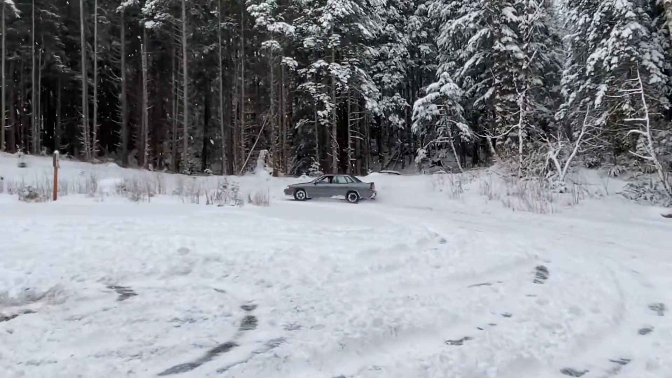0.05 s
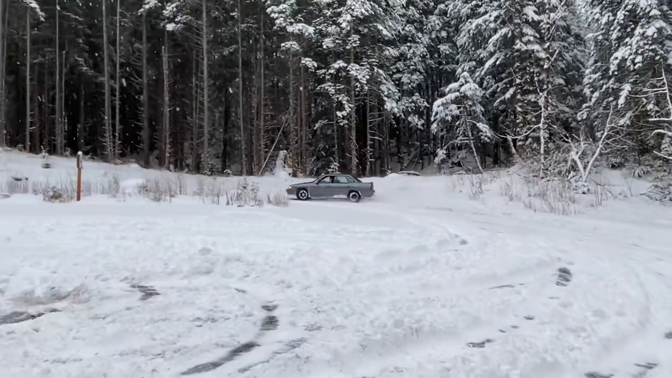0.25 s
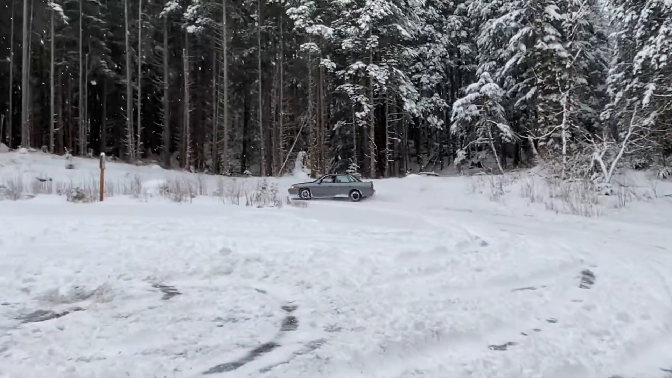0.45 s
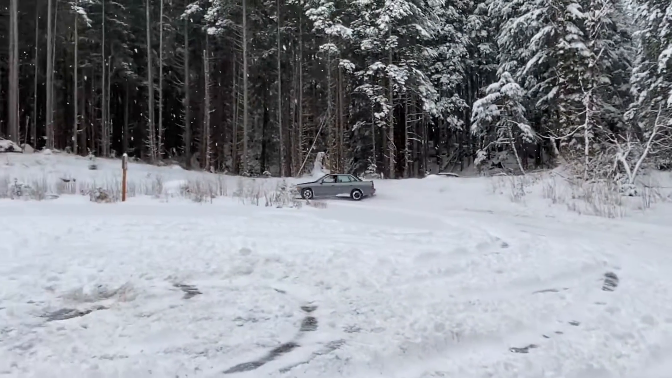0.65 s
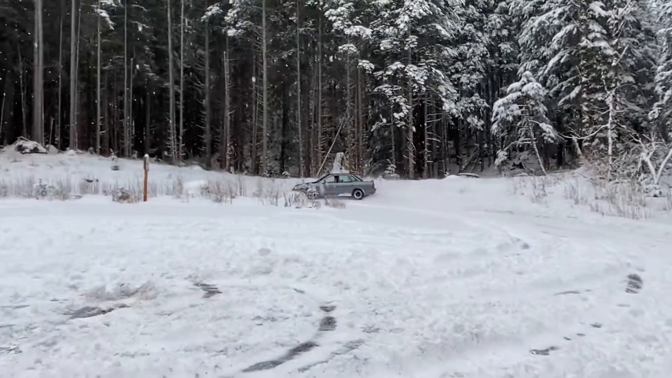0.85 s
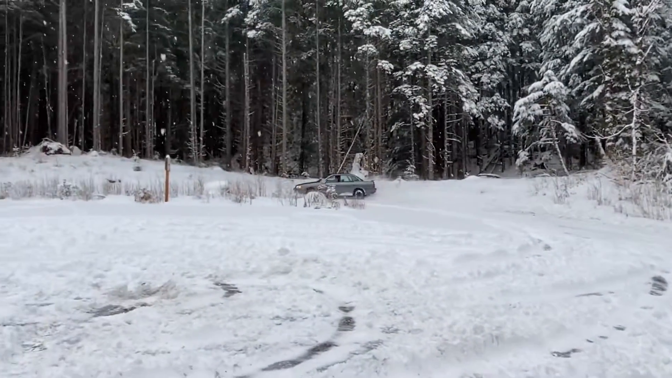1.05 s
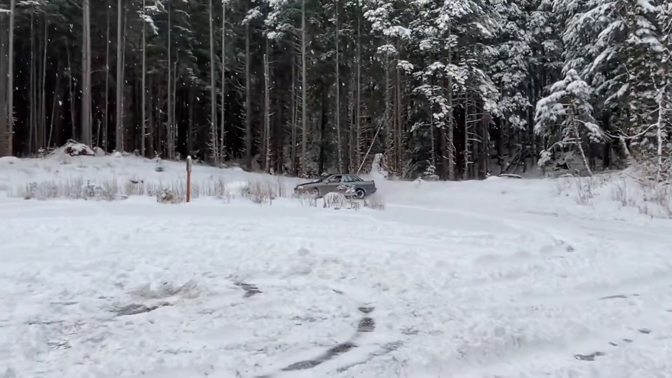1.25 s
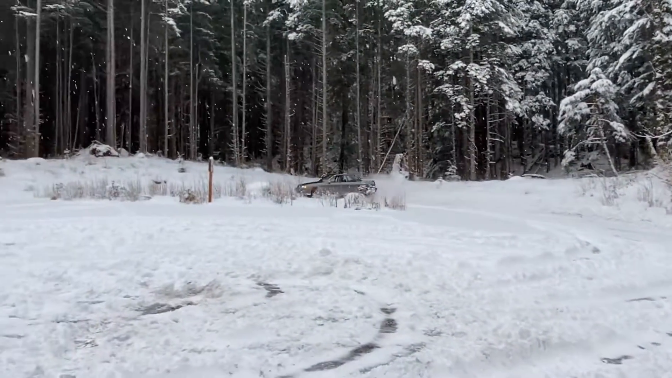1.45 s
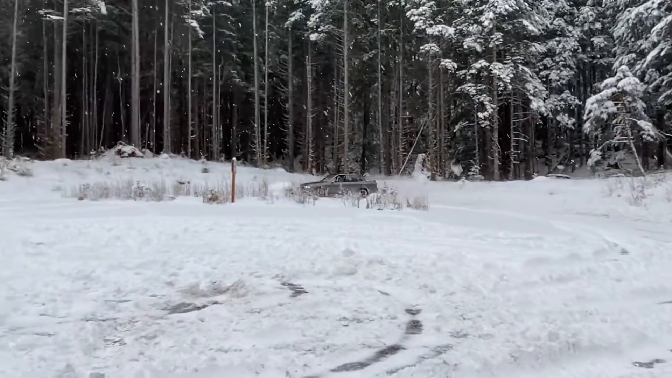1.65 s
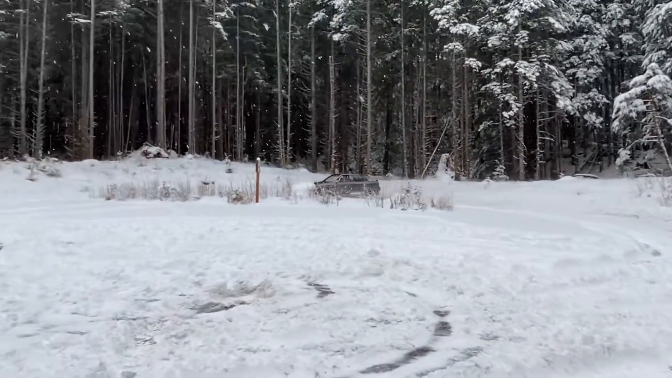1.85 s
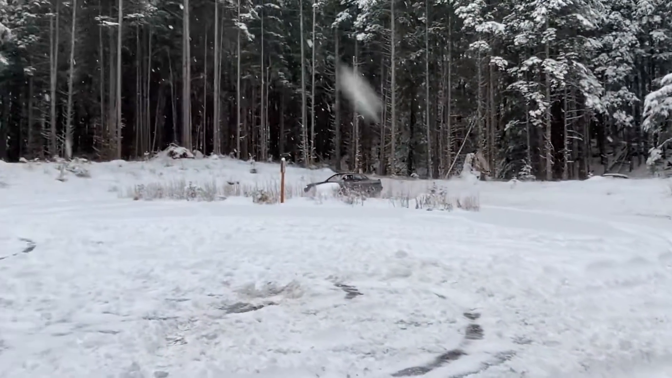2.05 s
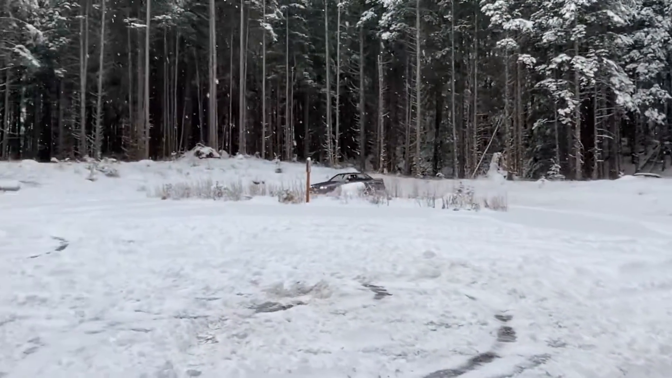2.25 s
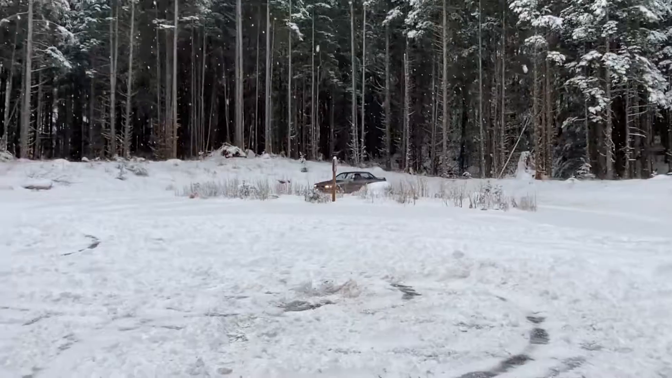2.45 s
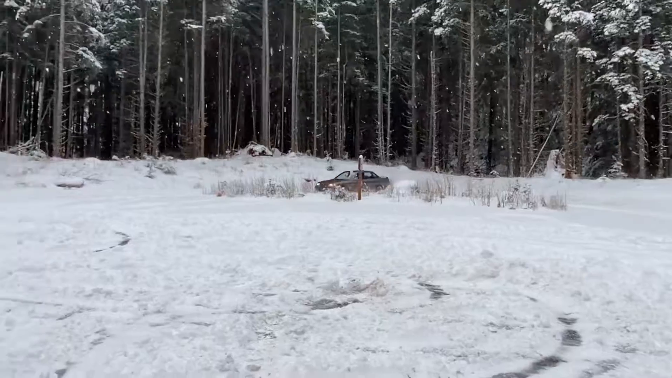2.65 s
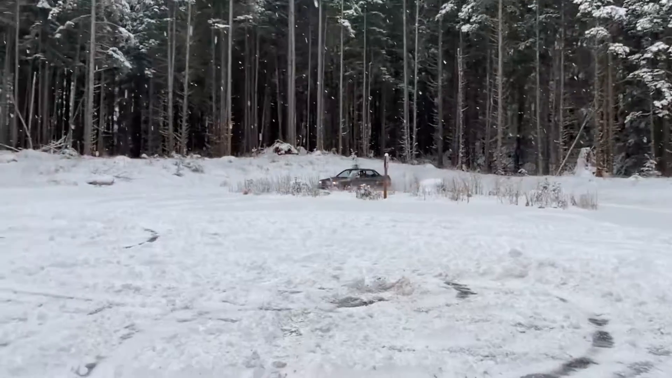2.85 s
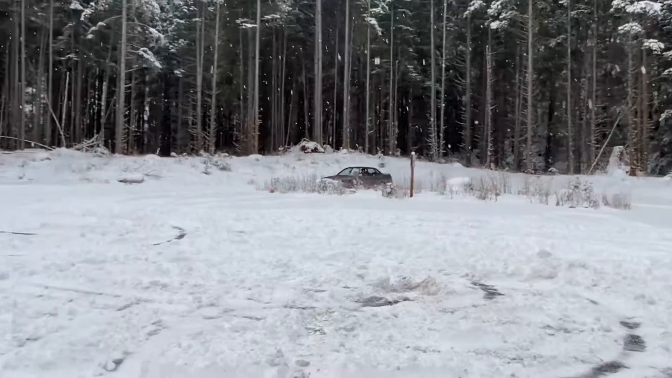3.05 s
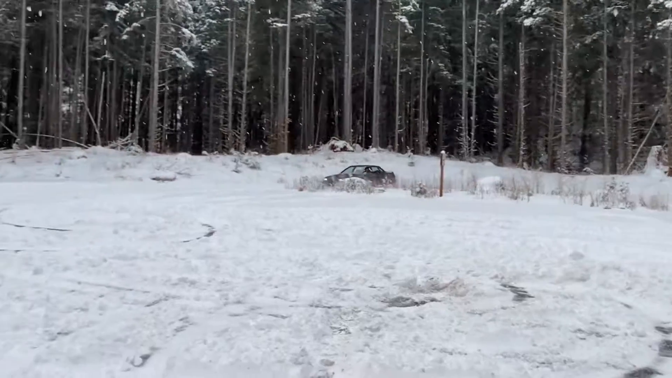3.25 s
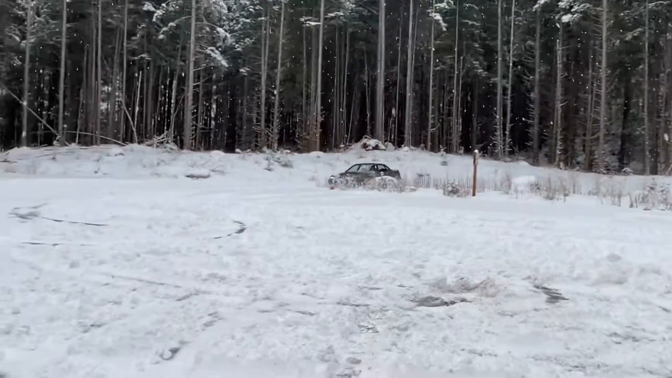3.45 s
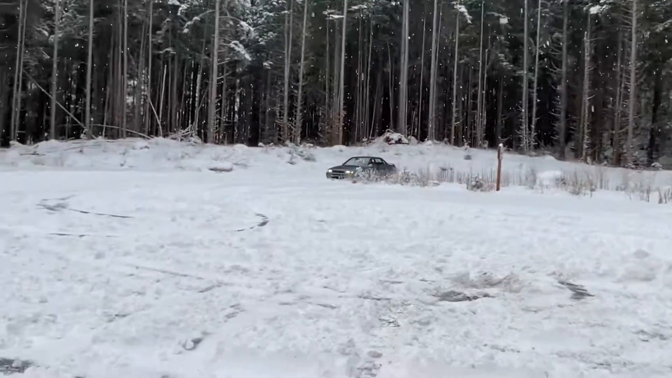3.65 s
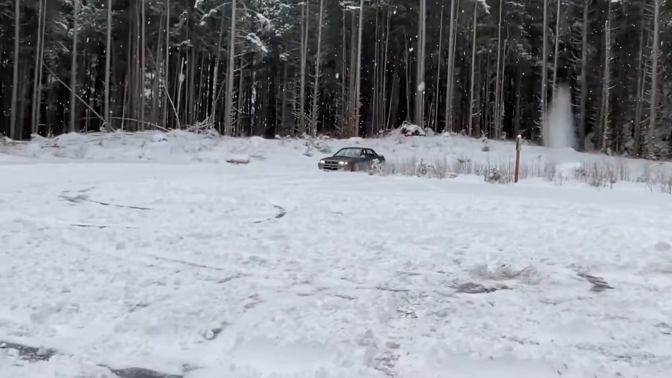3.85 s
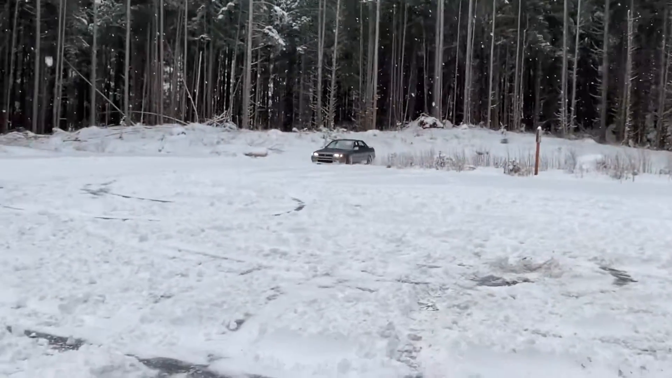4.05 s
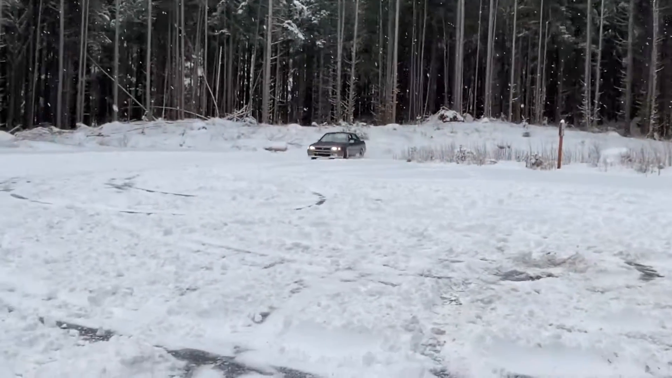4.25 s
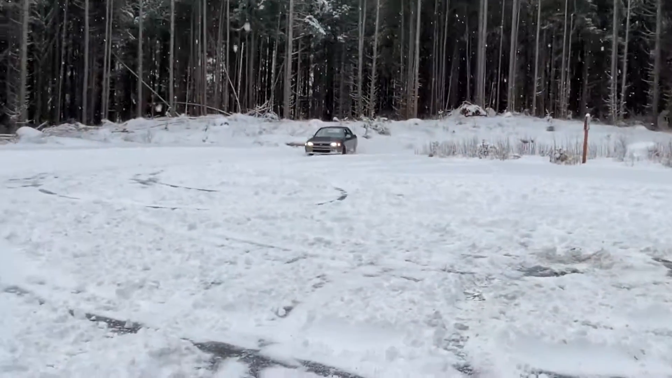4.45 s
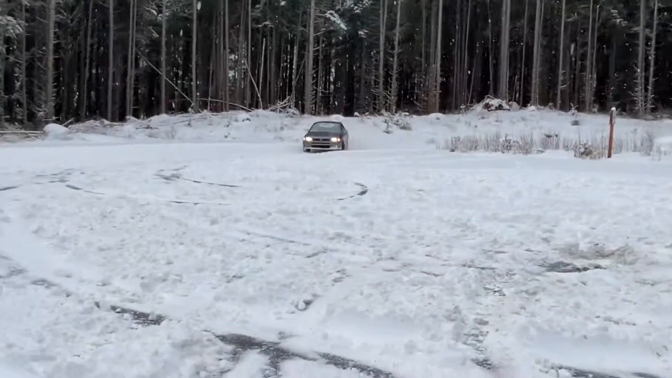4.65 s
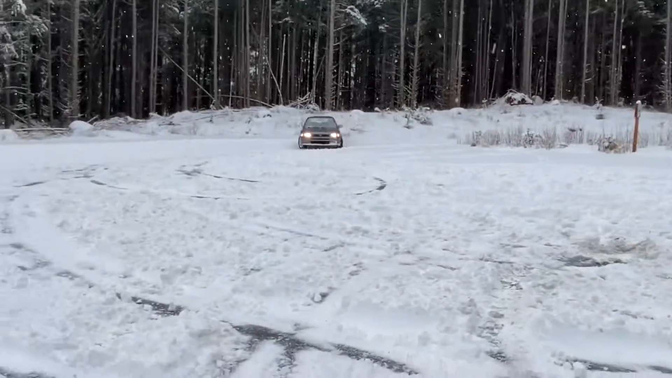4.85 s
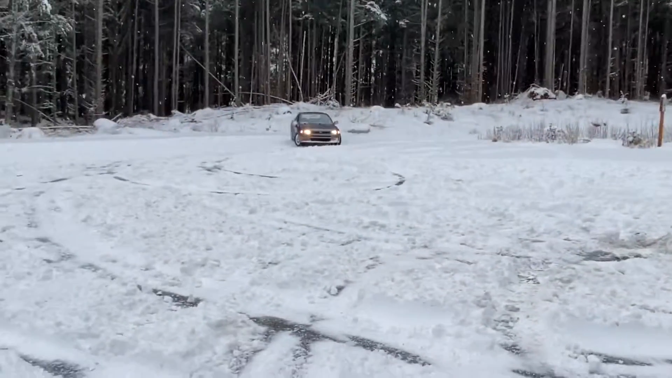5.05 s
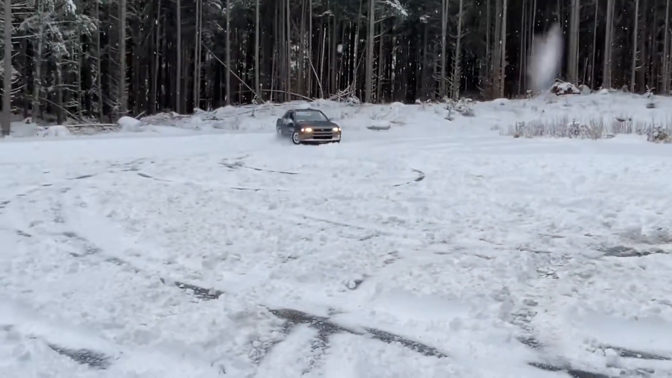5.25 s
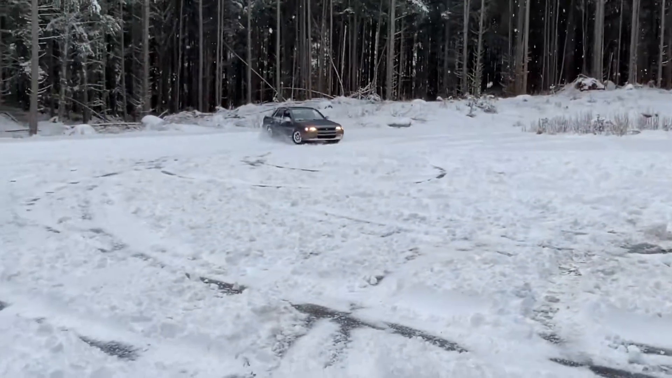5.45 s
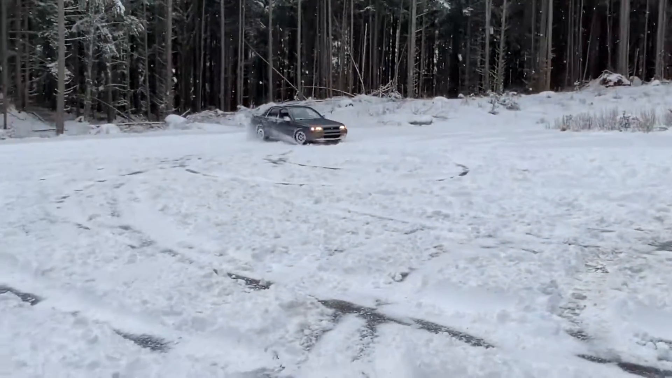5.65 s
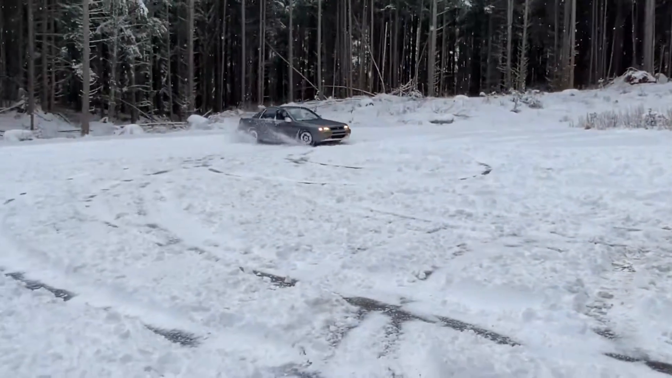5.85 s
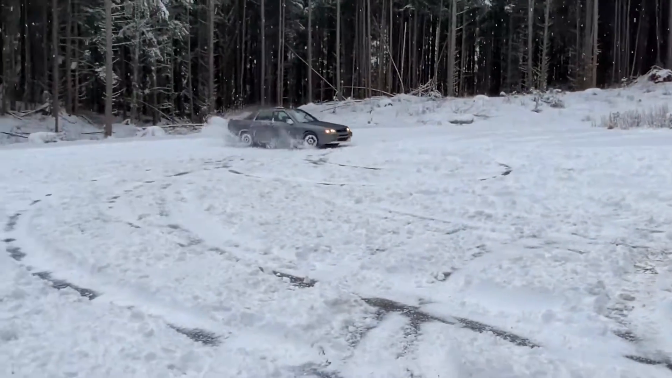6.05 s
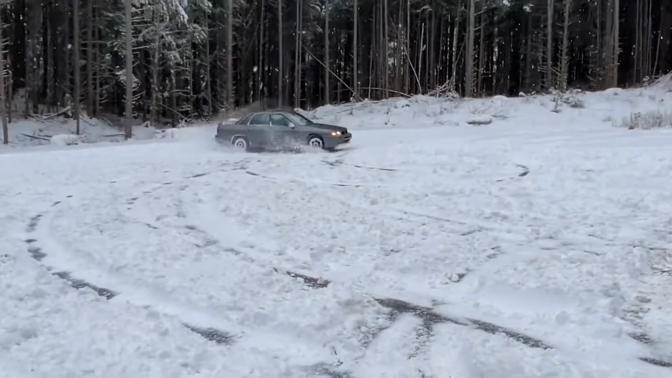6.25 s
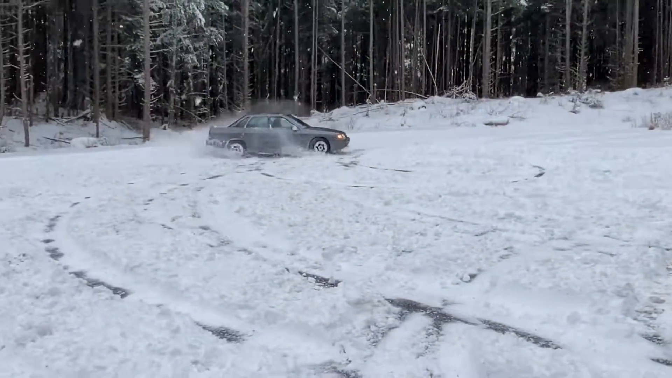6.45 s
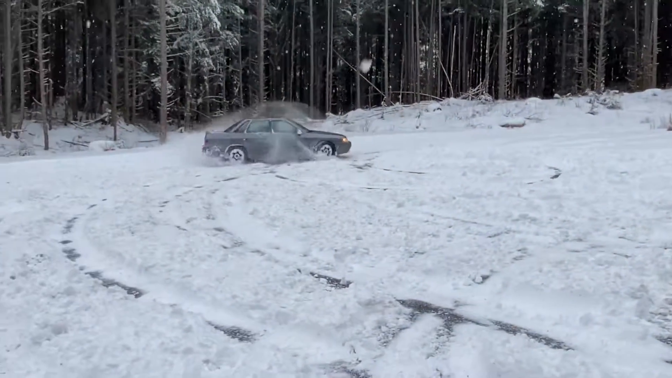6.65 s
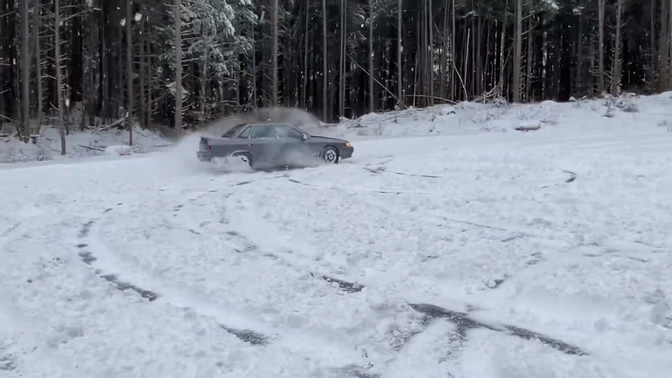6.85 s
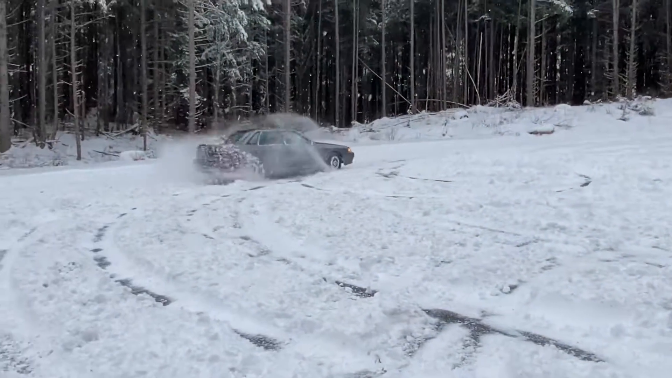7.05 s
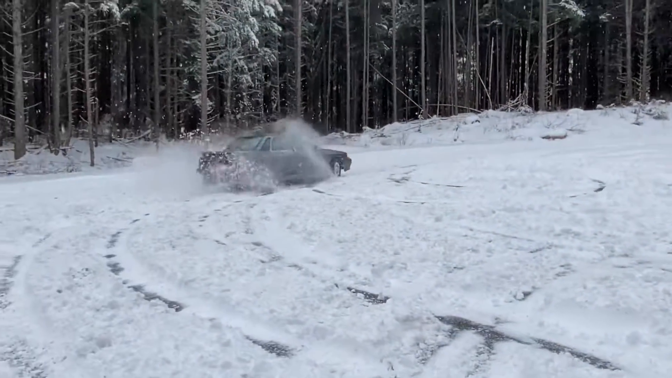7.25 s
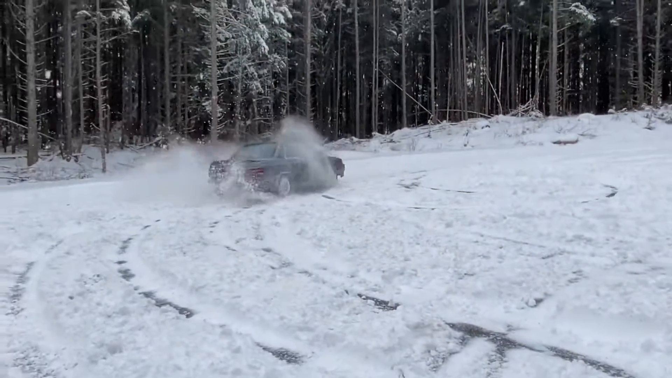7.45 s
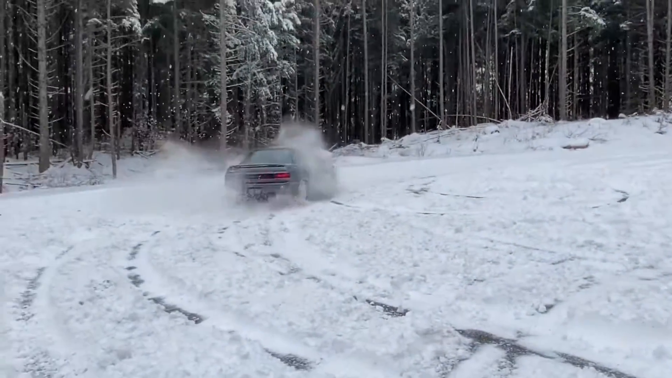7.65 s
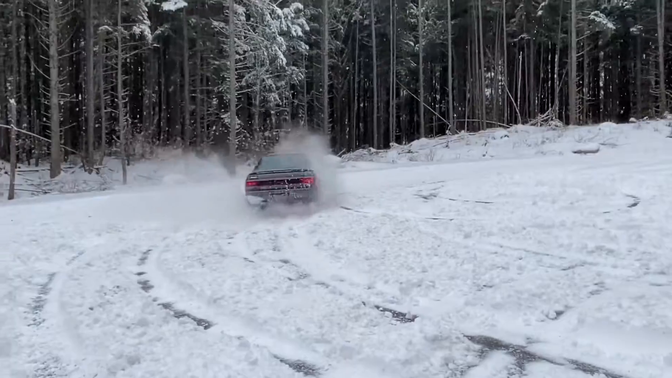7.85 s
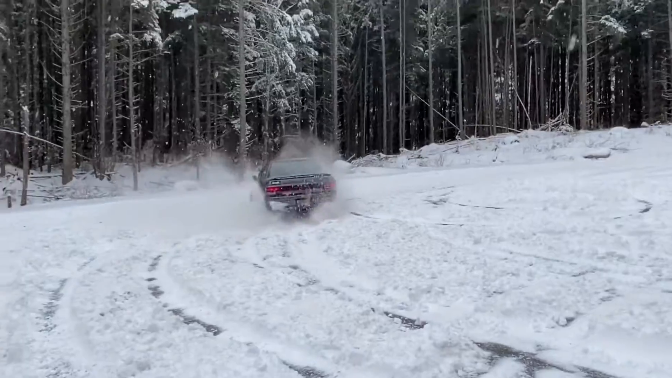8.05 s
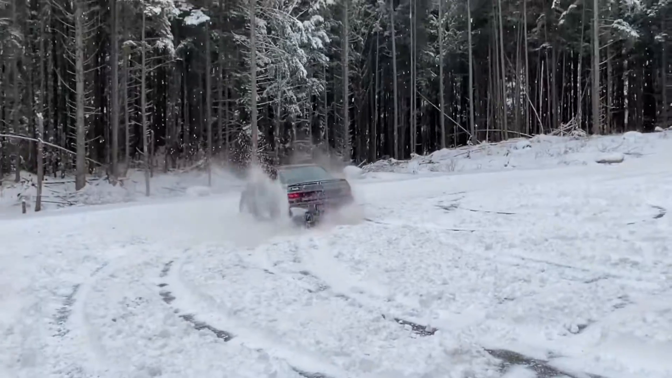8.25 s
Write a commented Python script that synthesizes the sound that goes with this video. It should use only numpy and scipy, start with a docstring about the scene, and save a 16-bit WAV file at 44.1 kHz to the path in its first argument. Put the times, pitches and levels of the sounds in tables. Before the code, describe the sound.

A lumpy exhaust note rises and falls as a car circles on snow. Early revs end in quick tailpipe pops, then the sound thins with distance. Chirping puffs of turbo air and soft thuds follow each throttle lift. The car comes nearer, roaring and buzzing at high revs with banging cracks, while tyres hiss through snow and trees give a short echo.

```python
"""Turbo car drifting in the snow

A turbocharged car with a lumpy engine drifts round a snowy clearing, from far off to close by; level curves place it.
The exhaust drones as sines on the orders of the engine cycle, and blasts at each firing strike its resonances.
On lifts it stumbles and thuds, and the compressor flutters; sharp cracks ring the tailpipe.
A sine tied to engine speed is the turbo whistle; filtered noise makes the snow spray and the rumble,
and a decaying noise tail makes the forest answer."""
import sys
import numpy as np
from scipy import signal
from scipy.fft import rfft, irfft
from scipy.io import wavfile
from scipy.ndimage import uniform_filter1d

SR = 44100
rng = np.random.default_rng(int(sys.argv[2]) if len(sys.argv) > 2 else 0)


def bounce(signal):
    """Save signal as a 16-bit WAV file at the path given by the first command-line argument."""
    frames = np.transpose(np.atleast_2d(signal))
    limited = np.clip(frames, -1, 1)
    pcm = np.round(limited * 32767).astype(np.int16)
    wavfile.write(sys.argv[1], SR, pcm)


N = 366471
TIME = np.arange(N) / SR
FREQ = np.arange(N // 2 + 1) * SR / N
CYLINDERS = 4
SPIN_HZ = 37.2  # cycle rate at which the gas hiss and the spray have their nominal level
BLAST_DELAY_S = .0015  # from the firing to its blast


def undb(db):
    """dB to gain."""
    return 10 ** (np.asarray(db) / 20)


def unit(x):
    """Scale to rms 1."""
    return x / np.sqrt(np.mean(x ** 2))


def even(x):
    """Level out slow swells, so that the level curves set the loudness."""
    return x / np.sqrt(uniform_filter1d(x ** 2, size=6000) + 1e-12)


def at(table, hz):
    """Read a (Hz, value) table on a log-frequency axis."""
    f, v = np.transpose(table)
    return np.interp(np.log(hz + 1), np.log(f + 1), v)


def curves(table):
    """Draw each column of a table against its first column, the time in seconds."""
    s, *columns = np.transpose(table)
    return [np.interp(TIME, s, column) for column in columns]


def walk(rate_hz):
    """Random levels held 1 / rate s and slewed twice; spread 1."""
    hold = int(SR / rate_hz)
    steps = np.repeat(rng.standard_normal(N // hold + 1), hold)
    return unit(uniform_filter1d(uniform_filter1d(steps, hold), hold)[:N])


def ring(x, modes):
    """Sum of resonances (Hz, width Hz, dB) with alternating signs."""
    out = 0
    for k, (hz, width_hz, db) in enumerate(modes):
        out = out + (-1) ** k * undb(db) * signal.lfilter(*signal.iirpeak(hz, hz / width_hz, SR), x)
    return out


def noise(table):
    """Noise of rms 1 with the given spectrum (Hz, dB per Hz)."""
    return unit(irfft(rfft(rng.standard_normal(N)) * undb(at(table, FREQ)), N))


def dull(x):
    """Steep low-pass at 12.4 kHz."""
    return signal.sosfilt(signal.ellip(8, .5, 50, 12400, fs=SR, output="sos"), x)


# Engine speed through the drift. Each row: time in seconds, engine cycles per second in Hz.
ENGINE_SPEED = [(0.0, 32.34), (0.23, 28.22), (0.32, 29.33), (0.76, 43.04), (1.1, 52.3), (1.28, 50.13),
                (1.64, 48.03), (1.9, 42.89), (1.98, 42.26), (2.61, 51.28), (2.82, 50.94), (3.1, 42.98),
                (3.56, 33.46), (3.89, 42.7), (3.98, 44.46), (4.35, 32.65), (4.47, 33.41), (4.67, 39.04),
                (4.84, 40.6), (5.19, 51.1), (5.6, 37.01), (6.11, 50), (6.23, 51.23), (6.5, 45.12),
                (6.59, 44.11), (6.73, 44.13), (6.94, 47.9), (7.22, 50.69), (7.35, 53.24), (7.62, 50.77),
                (7.84, 53.54), (7.98, 52.14), (8.31, 50.15)]


def engine_speed():
    """The engine's inertia rounds the corners of its speed curve."""
    inertia_s = .05
    return uniform_filter1d(curves(ENGINE_SPEED)[0], size=int(inertia_s * SR))


# Weight of each order of the cycle, in dB from order 1 up: uneven manifold runners favour some;
# higher orders take the last value.
ORDER_WEIGHTS = [-35.5, -20, 3.5, 6.5, 2, -14.5, 1.5, 5, 9, 9.5, 10, -6, -40, -3, -1.5, 0, -4.5, 3.5, -7,
                 -32, 3.5, 6.5, -1, 8.5, 10.5, 8]
# Exhaust pipe colour of the orders. Each row: frequency in Hz, gain in dB.
PIPE_COLOUR = [(70, 11), (130, -0.5), (210, -5.5), (285, -2.5), (355, 4.5), (450, -29), (565, -2.5),
               (650, 17), (750, 5.5), (1320, -9.5)]
# The fourth and fifth orders swell while the tail of the car shows. Each row: time in seconds, gain in dB.
FOURTH_FIFTH_SWELL = [(.4, 1), (1.2, 4.5), (1.6, -4), (3.1, -1.5), (4.6, 0.5), (5.3, -15), (5.9, 5),
                      (6.3, -12), (6.8, -0.5)]
# A band of orders stands out and shifts as the car swings round.
# Each row: time in seconds, centre in Hz, gain in dB.
SWINGING_BAND = [(0, 765, 7), (6.6, 815, 2.5), (7.15, 990, 15), (7.38, 850, 7), (7.52, 1150, 19),
                 (7.9, 1250, 1), (8.02, 1110, -30)]


def orders(cycle, hz, stumble, low_hz, high_hz):
    """The orders between two frequencies, each wavering alone, more when the engine stumbles."""
    swell_db, = curves(FOURTH_FIFTH_SWELL)
    band_hz, band_db = curves(SWINGING_BAND)
    band_width_hz = 164
    out = 0
    for k in range(1, 41):
        order_hz = k * hz
        share = np.clip(np.minimum(order_hz - low_hz, high_hz - order_hz) / 30 + .5, 0, 1)
        if not share.any():
            continue
        db = ORDER_WEIGHTS[min(k, len(ORDER_WEIGHTS)) - 1] + at(PIPE_COLOUR, order_hz)
        db = db + (1.5 + 4 * stumble) * walk(14)
        db = db + (k in (4, 5)) * swell_db
        db = db + band_db * np.exp(-((order_hz - band_hz) / band_width_hz) ** 2)
        slip = (.1 + .009 * k + .9 * stumble) * walk(22)  # radians
        # the square term spreads the orders over the several firings of a cycle
        out = out + share * undb(db) * np.cos(2 * np.pi * k * cycle - .8 * k * k + slip)
    return even(out)


# Moments in seconds at which a cycle's blast leaves the tailpipe; they keep the count in step.
BLAST_TIMES = [.484, .5691, .597, .63, .7053, .9078, 1.2162, 1.2955, 6.669, 6.803, 7.1366, 7.2845, 7.5175,
               7.689, 7.7275]


def in_step(cycle):
    """Shift the cycle count smoothly so that a cycle's blast falls on each listed moment."""
    count = np.interp(np.array(BLAST_TIMES) - BLAST_DELAY_S, TIME, cycle)
    behind = np.round(count) - count
    return cycle + 1 + np.interp(TIME, BLAST_TIMES, np.unwrap(behind, period=1))


# The tailpipe turns away behind the car and back. Each row: time in seconds, pipe ring, tip ring
# and silencer bark in dB over the rasp's orders, the other firings in dB relative to the main one.
FACING = [(0, 8, -20, 5.5, -2), (.3, -15, -25, 1, -9), (.6, -2, -21, 3.5, -12.5),
          (2.0, -10.5, -17, -2.5, -16), (2.6, -8.5, -17, -7.5, 5), (3.45, 0, -10, 1, -7),
          (3.65, -24, -19, 4.5, -8), (6.2, -6, -12, -4, -6), (6.7, -8.5, -9, 1, -17),
          (7.2, -8.5, -9.5, -5, -8), (7.6, 1, -6, 1, -9.5), (7.95, -14, -26, 1, -11)]


def cracks(turn, stumble):
    """A sharp blast at each firing, one cylinder set apart from the others; gas hisses on behind them."""
    others_db = curves(FACING)[3]
    firing = CYLINDERS * turn
    number = firing.astype(int)
    level_chance, time_chance = rng.standard_normal((N // 40, 2))[number].T
    other = number % CYLINDERS > 0
    late_s = (.00006 + .0003 * stumble) * time_chance
    since_firing_s = (firing % 1) / np.gradient(firing) / SR
    front = np.exp(-((since_firing_s - BLAST_DELAY_S - late_s) / .00004) ** 2)
    shock_db = (1.1 + 1.5 * other + 2.5 * stumble) * level_chance + other * others_db
    # the hiss thickens as the cycles come faster, and renews itself every 5.5 ms as it dies
    since_cycle_s = (turn % 1) / np.gradient(turn) / SR
    hiss_db = -25 + .6 * (np.gradient(turn) * SR - SPIN_HZ)
    decay = np.exp(-(since_cycle_s % .0055) / 0.004 - since_cycle_s / 0.02)
    return undb(shock_db) * front, undb(hiss_db) * decay * rng.standard_normal(N)


# Tailpipe resonances. Each row: frequency in Hz, width in Hz, gain in dB.
TAILPIPE = [(1735, 240, 7.5), (3500, 480, 0), (5600, 400, -6), (7100, 1000, 0)]
# The pipe's tip, whose beamed ring carries only from close by.
# Each row: frequency in Hz, width in Hz, gain in dB.
PIPE_TIP = [(2570, 250, -2)]
# Silencer body, struck by blasts and backfires. Each row: frequency in Hz, width in Hz, gain in dB.
SILENCER = [(648, 186, 18.5), (1074, 774, 9), (1482, 306, 5.5)]


def rasp(cycle, hz, stumble, shocks, hiss):
    """Upper orders, with the tailpipe, its tip and the silencer shell ringing from each blast."""
    ring_db, tip_db, bark_db, _ = curves(FACING)
    # while the body hides the tailpipe the orders arrive blurred
    hidden = .8 * np.clip(5 * np.minimum(TIME - 2.9, 6.45 - TIME), 0, 1)
    tone = orders(cycle, hz, np.maximum(stumble, hidden), 430, 1318)
    pulses = shocks + hiss
    pipe = even(ring(ring(pulses, TAILPIPE[:1]), TAILPIPE[:1]))
    tip = even(ring(ring(pulses, PIPE_TIP), PIPE_TIP))
    # the silencer's shell passes little above this low-pass
    bark = even(signal.lfilter(*signal.butter(2, 1790, fs=SR), ring(shocks, SILENCER)))
    return tone + undb(ring_db) * pipe + undb(tip_db) * tip + undb(bark_db) * bark


# The bright edge of the blasts carries while the pipe points this way. Each row: time in seconds, level in dB.
BRIGHT_EDGE = [(.2, -66), (.3, -51), (.55, -41), (.75, -31.5), (1.05, -47.5), (1.27, -36), (1.45, -57),
               (6.4, -54.5), (7.1, -36), (7.65, -32), (7.75, -72)]


def bright_edge(shocks, hiss):
    """The tailpipe's high resonances ring beside the bare slope of each shock."""
    high_ring = even(ring(shocks + hiss / 2, TAILPIPE[1:]))
    bare_shock = even(np.gradient(shocks))
    return undb(curves(BRIGHT_EDGE)[0]) * (high_ring + undb(-4) * bare_shock)


FLICKER_DB = 1.8  # spread of the flicker of the spray and of the top of the hiss
# Top of the hiss, loudest while the tailpipe points this way. Each row: time in seconds, level in dB.
TREBLE_LEVEL = [(.4, -67), (.95, -33), (1.45, -84), (5.9, -79), (6.6, -47.5), (7.25, -26.5), (7.9, -43),
                (8.05, -70)]
# Resonances of that hiss. Each row: frequency in Hz, width in Hz, gain in dB.
TREBLE_RINGS = [(7040, 1900, 11), (11000, 1900, 10)]


def treble_hiss(turn):
    """Noise that sinks through each engine cycle, coloured by two broad resonances."""
    gas = np.exp(-(turn % 1) / .5) * rng.standard_normal(N)
    level_db = curves(TREBLE_LEVEL)[0] + FLICKER_DB * walk(10)
    return undb(level_db) * unit(ring(gas, TREBLE_RINGS))


# Spectrum of the snow spray. Each row: frequency in Hz, density in dB per Hz.
SNOW_SPECTRUM = [(900, 9), (2200, 6), (4500, 1.5), (8600, -14), (10000, -1.5), (12500, -12)]


def spray_level(snow_db, hz):
    """The spray in dB grows as the wheels spin up, and a little with load."""
    full_load_hz_per_s, load_lag_s = 11, .031
    gain = np.clip(np.gradient(hz) * SR / full_load_hz_per_s, -1, 1)
    load = uniform_filter1d(gain, size=int(load_lag_s * SR) + 1) / 2
    return snow_db + 11 + 1 * load + 0.19 * (hz - SPIN_HZ)  # load swings it by 1 dB in all


def snow_spray(turn, spray_db):
    """Snow hisses off the tyres as flickering noise with a slight pulse on each engine cycle."""
    pulse = 1 + 0.21 * np.exp(-(turn % 1) / 0.95)
    return undb(spray_db + FLICKER_DB * walk(30)) * noise(SNOW_SPECTRUM) * pulse


def snow_side(spray_db):
    """The part of the spray that differs between the ports, as independent noise."""
    side = dull(undb(spray_db - 6) * noise(SNOW_SPECTRUM))
    return np.array([side, -side])


# Rumble of tyres and body. Each row: frequency in Hz, density in dB per Hz.
RUMBLE_SPECTRUM = [(18, -70), (30, 0), (136, -6), (426, -11), (697, -19), (1680, -32), (2400, -65)]


def rumble(level_db):
    """Tyres and body rumble as low noise."""
    return undb(level_db) * noise(RUMBLE_SPECTRUM)


def forest(x):
    """Trunks scatter a dense tail without deep bass or top, different at each port."""
    t60_s, low_hz, high_hz = 0.58, 250, 4770
    t = TIME[:SR]
    tail = rng.standard_normal((2, SR)) * np.exp(-np.log(1000) * t / t60_s) * (t > .02)
    tail += 1.5 * tail.mean(axis=0)  # the ports share part of it
    tail = signal.lfilter(*signal.butter(1, [low_hz, high_hz], "band", fs=SR), tail)
    tail /= np.sqrt(np.sum(tail ** 2, axis=1, keepdims=True))
    return undb(-15) * signal.fftconvolve(x[None], tail, axes=1)[:, :N]


# Sharp cracks in the tailpipe: backfires and some strong cycle blasts.
# Each row: time in seconds, crack level in dB, pipe ring in dB over the crack.
SHARP_CRACKS = [(0.255, -52.5, 4), (0.4, -41.5, 2.5), (1.158, -42, -1), (1.204, -40.5, -2),
                (1.217, -34, -7), (1.2341, -35, -3), (1.256, -39, -9), (1.276, -40, -3),
                (1.2961, -43.5, -7), (7.3891, -33.5, 7), (7.408, -33, -2), (7.422, -25, -1),
                (7.442, -27.5, -3), (7.6343, -30.5, 6), (7.9076, -37, 7.5), (7.9321, -41, 18),
                (7.9604, -37.5, 8), (7.981, -44, -9), (7.9991, -40, 3.5)]


def sharp_cracks():
    """Each crack is a shock that rings the pipe, with a short bright burst behind it."""
    crack, blow, t = np.zeros(N), np.zeros(N), TIME[:1500]
    shock = np.exp(-((t - .0001) / .00005) ** 2)
    for s, db, ring_db in SHARP_CRACKS:
        i = int(s * SR)
        burst = (np.exp(-t / .0012) + .07 * np.exp(-t / .008)) * rng.standard_normal(len(t))
        crack[i:i + len(t)] += undb(db) * burst
        blow[i:i + len(t)] += undb(db + ring_db) * shock
    body = undb(30) * ring(blow, TAILPIPE[:1])
    body += undb(37) * ring(blow, PIPE_TIP)
    body += undb(17) * ring(blow, SILENCER)
    bright = signal.lfilter(*signal.butter(2, [3000, 12000], "band", fs=SR), crack)
    return body + undb(20) * ring(crack, TAILPIPE[1:]) + undb(17.5) * bright


# Unburnt charges thudding in the exhaust on a lift. Each row: time in seconds, relative level in dB, pitch in Hz.
THUDS = [(1.182, -36.5, 102), (1.239, -37.5, 50.3), (2.909, -42.5, 82.6), (3.057, -41.5, 90),
         (3.319, -42, 84), (4.024, -39.5, 109), (5.249, -30.5, 93.6), (5.461, -31.5, 103),
         (6.312, -25, 101), (6.372, -28, 99), (7.392, -30.5, 103), (7.418, -29, 52), (7.922, -28, 118),
         (7.967, -34, 103)]


def thuds():
    """Soft low blows that ring a few cycles."""
    out, t = np.zeros(N), TIME[:6000]
    swell = 7.7 * t / 0.0067 * np.exp(-t / 0.017)
    for s, db, hz in THUDS:
        i = int(s * SR)
        out[i:i + len(t)] += undb(db) * swell * np.sin(2 * np.pi * hz * t)
    return out


def stumbling():
    """The engine runs unevenly around each unburnt charge, from 0 for steady to 1."""
    return np.clip(sum(np.exp(-((TIME - s - .03) / 0.085) ** 2) for s, *_ in THUDS), 0, 1)


# Standing waves of the charge pipe, ringing in the surge air.
# Each row: frequency in Hz, width in Hz, gain in dB.
CHARGE_PIPE = [(1220, 140, 5.5), (1663, 100, 6.5), (2147, 140, 2.5), (2578, 70, 7), (3170, 160, 4.5),
               (3645, 72, 2.5), (4680, 570, -4.5)]
# Compressor surge on a lift, puff by puff.
# Each row: start in seconds, length in seconds, level in dB, chirp in Hz, chirp in dB over its puff.
SURGE_PUFFS = [(1.441, 0.13, -41.5, 1270, 5.5), (1.562, 0.06, -41.5, 2700, 10),
               (1.64, 0.049, -35, 1730, -1), (1.722, 0.044, -40, 2260, 4), (2.781, 0.057, -31.5, 2330, -3),
               (2.868, 0.069, -34.5, 2740, -10), (2.938, 0.06, -36.5, 2355, 2),
               (3.192, 0.14, -35.5, 1763, -10), (3.336, 0.13, -37.5, 1790, 1.5),
               (3.916, 0.093, -31, 3560, -3), (4.018, 0.08, -32, 3600, -2), (4.1, 0.14, -35, 2030, -5.5),
               (4.267, 0.055, -36, 3330, -3), (5.169, 0.074, -25, 2654, 2), (5.248, 0.075, -31.5, 3260, 4),
               (5.331, 0.047, -32, 2520, 8.5), (6.204, 0.05, -20.5, 1580, -5.5),
               (6.293, 0.047, -22.5, 1558, -3), (6.386, 0.035, -24, 2170, -3.5)]


def surge():
    """Boost bursts back through the compressor: puffs of air in the charge pipe, each with a sagging chirp."""
    air = unit(sum(undb(3 * walk(25)) * ring(rng.standard_normal(N), [mode]) for mode in CHARGE_PIPE))
    grain_db, tremble = 2.5 * walk(130), walk(300)
    out = np.zeros(N)
    for s, length, db, hz, chirp_db in SURGE_PUFFS:
        part = slice(int(s * SR), int((s + length + .1) * SR))
        t = TIME[part] - s
        shape = np.clip(t / 0.018, 0, 1) * np.exp(-np.maximum(t - length, 0) / 0.0075)
        chirp_hz = hz * (1 - 0.047 * t / length) + 65 * tremble[part]
        chirp = np.sin(2 * np.pi * np.cumsum(chirp_hz) / SR)
        out[part] += undb(db) * shape * (air[part] + undb(chirp_db + grain_db[part]) * chirp)
    return out


# Spool-ups of the turbo. Each row: start in seconds, length in seconds, level in dB,
# whistle as a multiple of the engine cycle rate at the start, and at the end.
SPOOL_UPS = [(1.93, .52, -60, 246, 268), (3.62, .33, -58, 245, 277), (4.56, .74, -55, 260, 280),
             (5.5, .78, -52, 276, 284)]


def whistle(hz):
    """The compressor wheel sings a thin, unsteady tone that gains on the engine as boost builds."""
    top_hz = 12600  # the tone is turned down above this
    out = np.zeros(N)
    for s, length, db, first, last in SPOOL_UPS:
        fade = np.clip(np.minimum(TIME - s, s + length - TIME) / 0.026, 0, 1)
        tone_hz = hz * np.interp(TIME, [s, s + length], [first, last])
        tone = np.sin(2 * np.pi * np.cumsum(tone_hz + 110 * walk(150)) / SR)
        flicker_db = 3.5 * walk(20) - np.clip(tone_hz - top_hz, 0, 500) / 70
        out += fade * undb(db + flicker_db) * tone
    return out


# Phase between the microphone ports. Each row: frequency in Hz, lead of the left port in radians.
PORT_PHASE = [(20, -0.44), (300, 0.3), (800, 0.86), (2150, 1.22), (4200, 1.58), (7000, 1.3), (10400, 2),
              (12500, -2)]
# Balance of the ports. Each row: frequency in Hz, left minus right in dB.
PORT_BALANCE = [(60, -1), (200, -2), (800, 0.5), (2400, -0.5)]


def two_ports(car):
    """Split the phase and level difference evenly between two microphone ports."""
    half = undb(at(PORT_BALANCE, FREQ) / 2) * np.exp(.5j * at(PORT_PHASE, FREQ))
    spectrum = rfft(car)
    return np.array([irfft(spectrum * half, N), irfft(spectrum / half, N)])


# How loud the car arrives as it circles, nears and turns. Each row: time in seconds, drone in dB,
# upper drone in dB, rasp in dB, snow hiss in dB before its wheel-spin gain.
DRIVE = [(0.0, -22.5, -66, -45.5, -57), (0.14, -25.5, -73, -51, -64.5), (0.28, -21, -43, -34.5, -56),
         (0.92, -29, -30, -30, -50), (1.8, -39, -37.5, -37.5, -60), (2.8, -30.5, -39, -36.5, -53),
         (3.42, -30.5, -52.5, -46, -61.5), (3.89, -31, -35.5, -42.5, -52), (4.44, -25.5, -60, -48, -53.5),
         (5.07, -19, -32.5, -36, -50.5), (5.3, -10.5, -36, -28.5, -40), (5.44, -14, -46, -38.5, -49),
         (5.85, -15.5, -24.5, -32, -48.5), (6.178, -10.5, -26, -35.5, -41),
         (6.62, -15.5, -19, -30.5, -46.5), (7.15, -7.5, -20.5, -16, -43.5), (7.41, -6.5, -19.5, -20, -41),
         (7.75, -11, -15, -19, -50), (8.12, -12.5, -21, -26, -58.5), (8.31, -12.5, -23, -29, -54)]


def scene():
    """The car, its echo and the rumble, at two microphone ports."""
    drone_db, upper_db, rasp_db, snow_db = curves(DRIVE)
    hz = engine_speed()
    stumble = stumbling()
    cycle = np.cumsum(hz) / SR
    turn = in_step(cycle)
    shocks, hiss = cracks(turn, stumble)
    spray_db = spray_level(snow_db, hz)

    car = undb(drone_db - 1.6 * stumble ** 2) * orders(cycle, hz, stumble, 27, 254.6)
    car += undb(upper_db) * orders(cycle, hz, stumble, 253.6, 527.0)
    car += undb(rasp_db) * rasp(cycle, hz, stumble, shocks, hiss)
    car += bright_edge(shocks, hiss)
    car += treble_hiss(turn)
    car += snow_spray(turn, spray_db)
    car += rumble(drone_db - 28 + 13 * stumble)
    car = undb(-1.9 * stumble) * car + surge() + thuds()
    car = dull(car) + sharp_cracks() + whistle(hz)
    car += rumble(-40 + 2.5 * walk(3))  # a bed that does not follow the drive
    return two_ports(car) + forest(car) + snow_side(spray_db)


def record(dry):
    """The phone drops the deepest bass, rounds the loudest peaks and cuts the top."""
    dry = signal.sosfilt(signal.butter(3, 45, "high", fs=SR, output="sos"), dry)
    rounded = np.tanh(0.76 * dry) / 0.89
    return signal.sosfilt(signal.ellip(8, .2, 70, 16000, fs=SR, output="sos"), rounded)


dry = scene()
out = record(dry)
bounce(out)
```